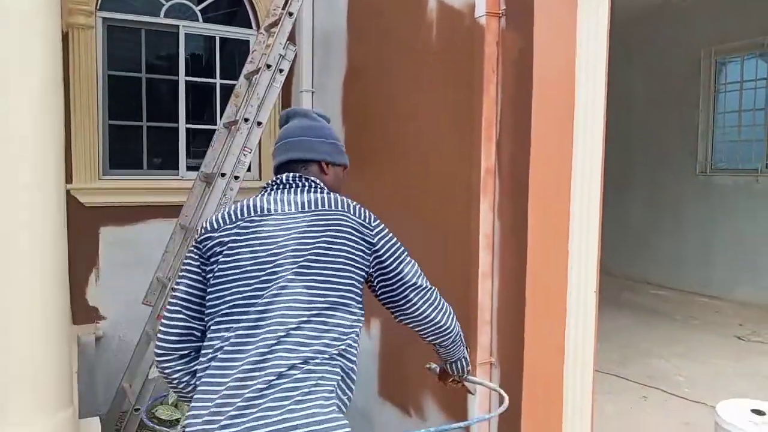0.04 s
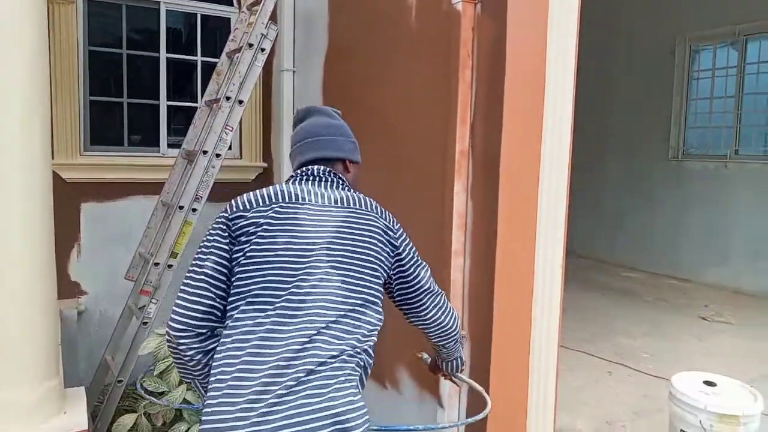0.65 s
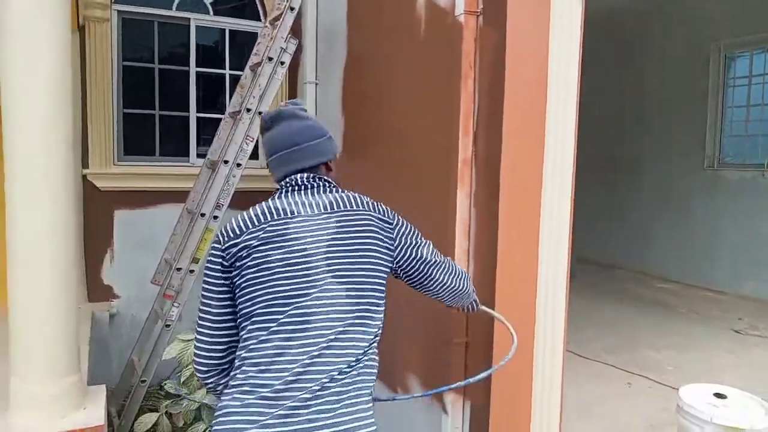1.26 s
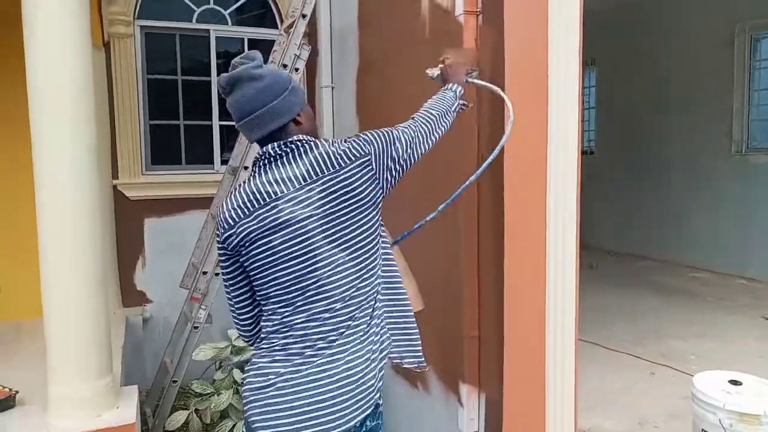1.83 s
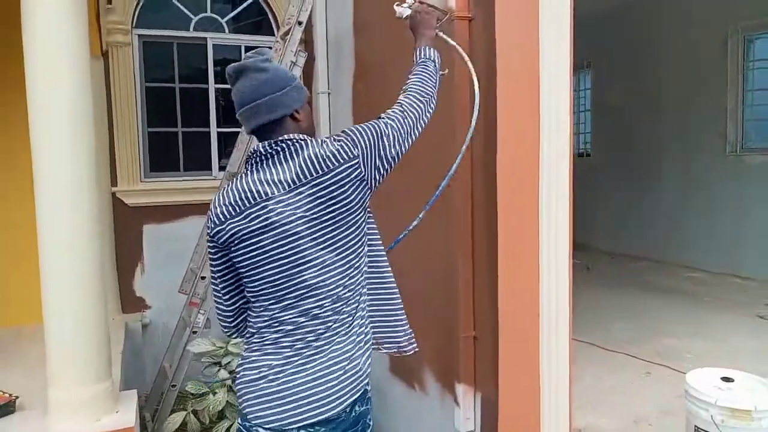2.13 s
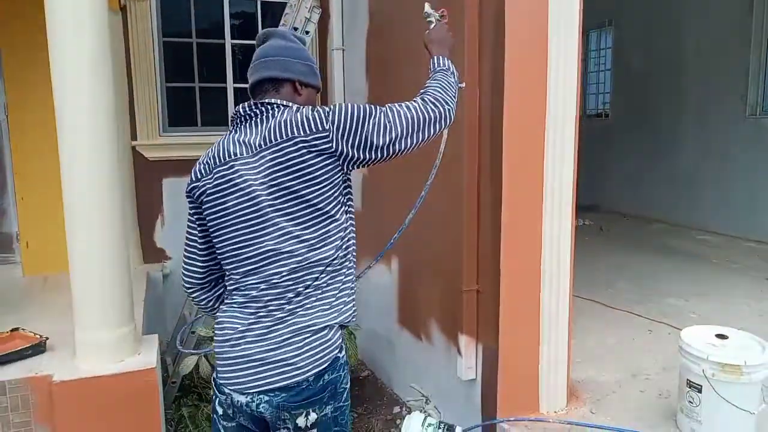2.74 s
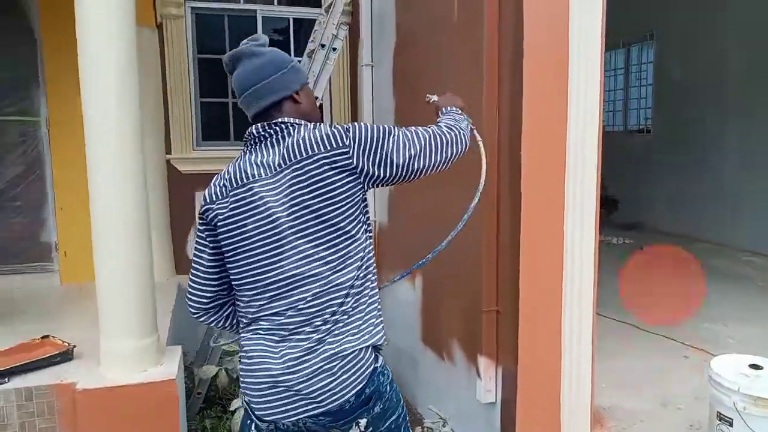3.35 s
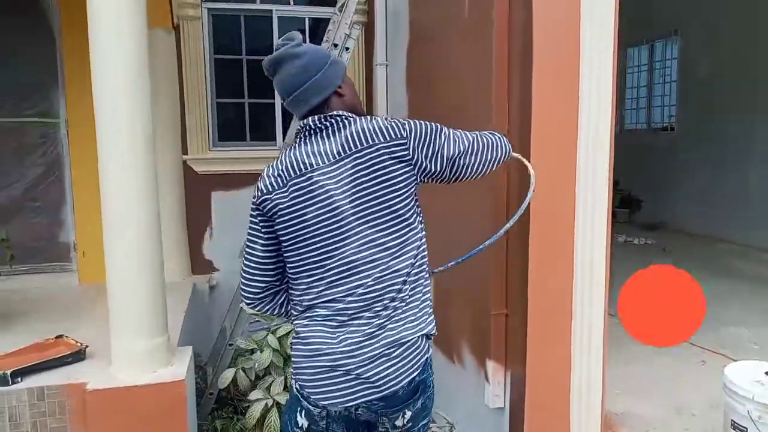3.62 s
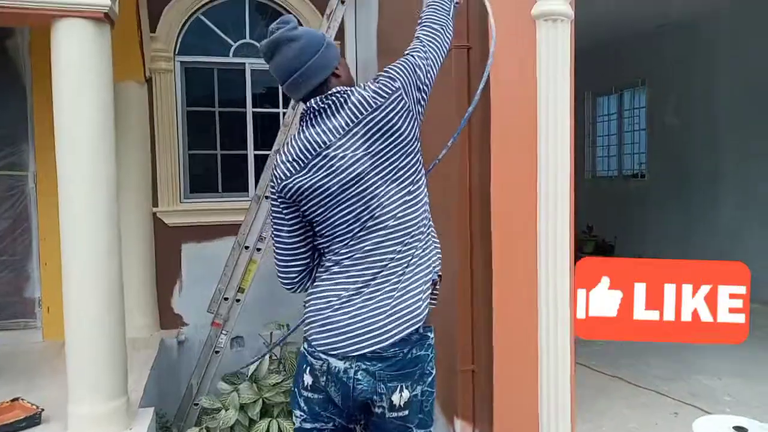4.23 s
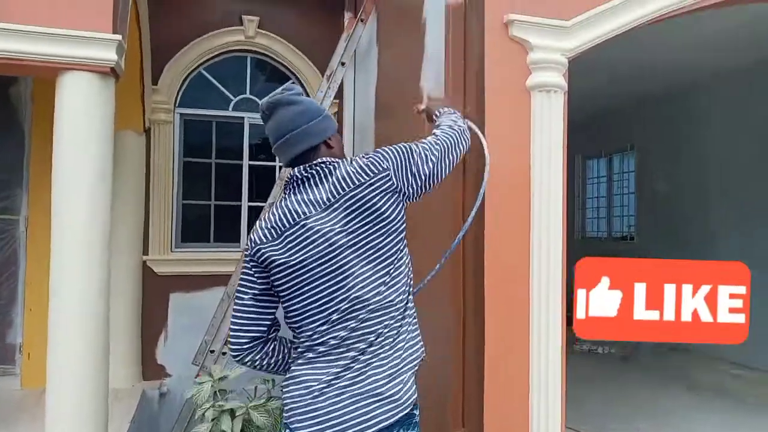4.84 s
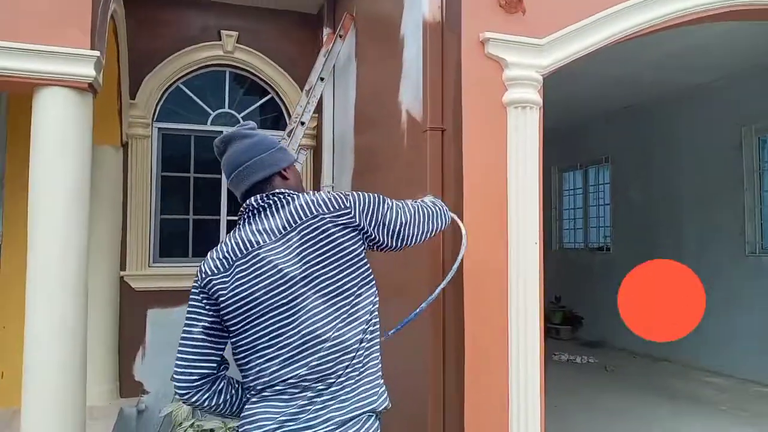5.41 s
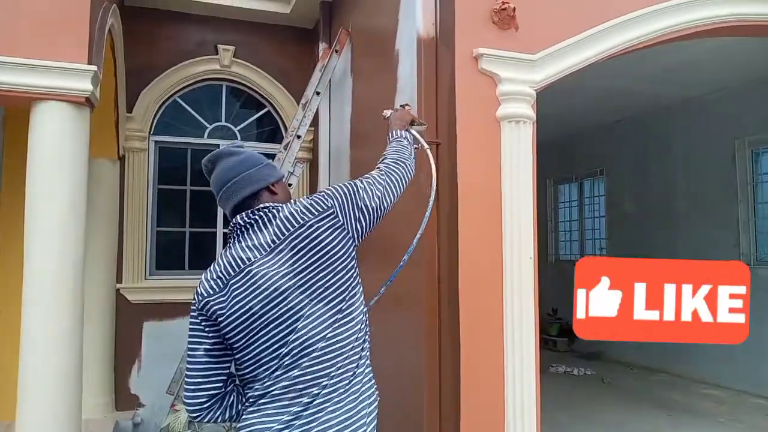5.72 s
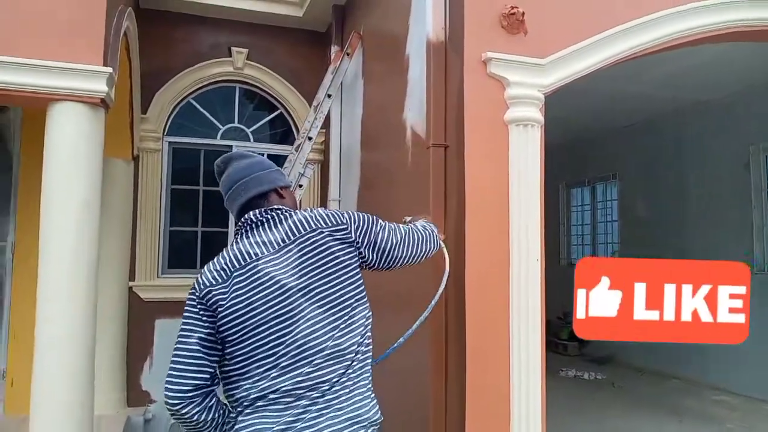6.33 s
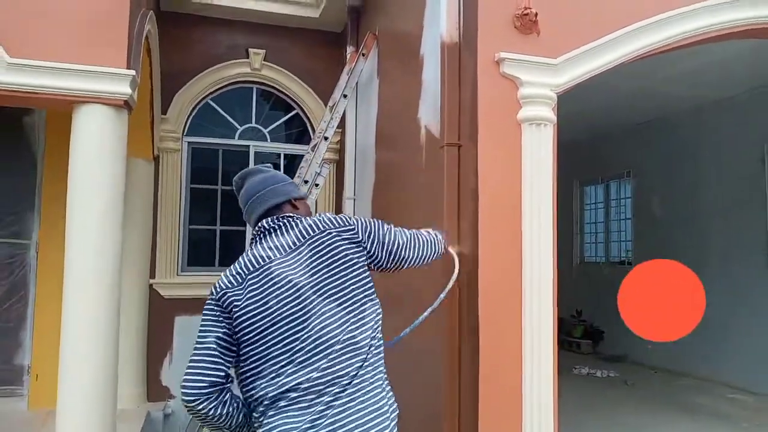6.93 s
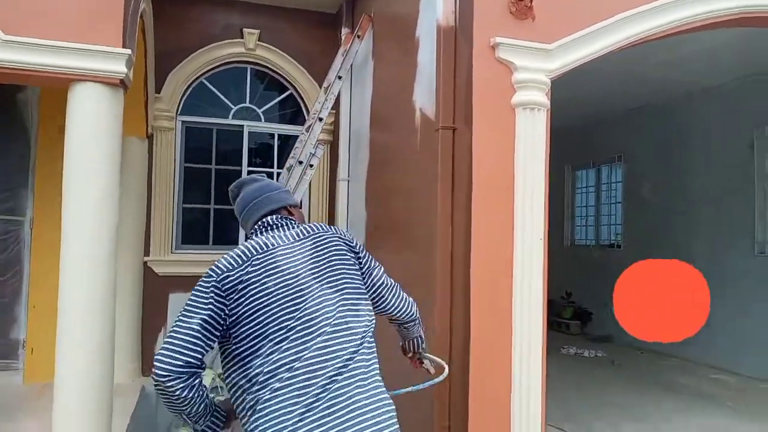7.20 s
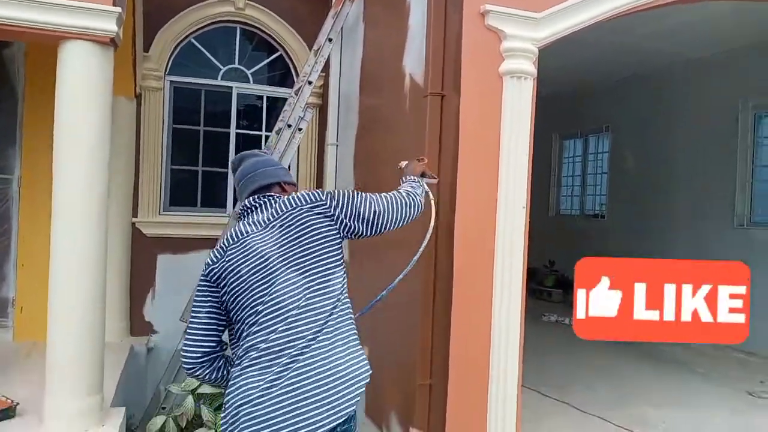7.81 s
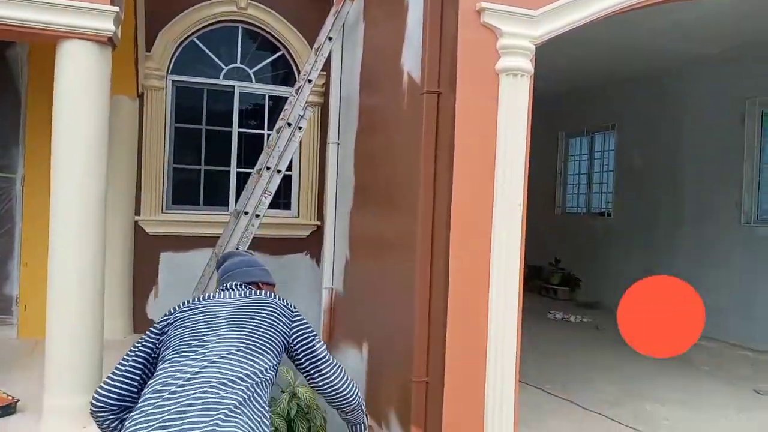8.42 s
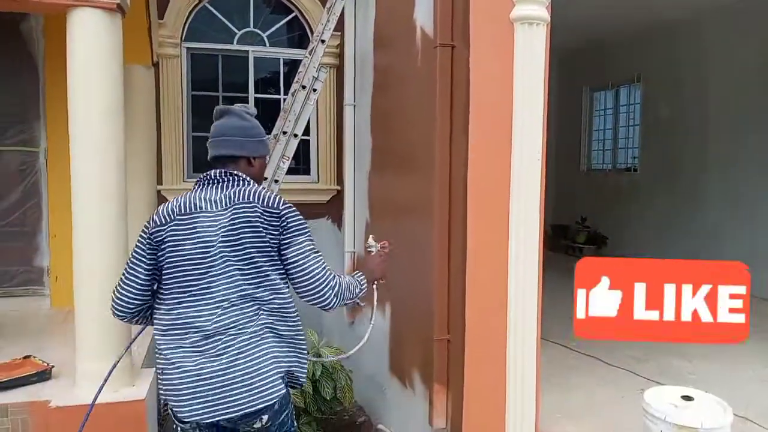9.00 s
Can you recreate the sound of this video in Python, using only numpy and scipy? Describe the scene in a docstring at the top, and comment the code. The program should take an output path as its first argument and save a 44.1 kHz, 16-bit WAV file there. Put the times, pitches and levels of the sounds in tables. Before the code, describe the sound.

A paint sprayer hisses in five short bursts outdoors, while its electric pump whirs up, clatters and knocks in between.

```python
"""Airless spraying beside an open garage

A painter sprays a house wall in five bursts: the jet atomises with a hiss and patters on the wall.
Spraying drops the pressure, so an electric piston pump runs up, then coasts: its gears clatter, its
piston knocks and its whine sags under each stroke. A distant engine hums, clothes rustle and wind
bumps the microphone. The phone's gain control turns everything down while the gun hisses."""
import sys
import numpy as np
from scipy import signal
from scipy.fft import rfft, irfft, next_fast_len
from scipy.io import wavfile
from scipy.ndimage import uniform_filter1d

SR = 44100
rng = np.random.default_rng(int(sys.argv[2]) if len(sys.argv) > 2 else 0)


def generate_wav(signal):
    """Clip the signal to [-1, 1] and save it as 16-bit WAV at the path in sys.argv[1]."""
    frames = np.transpose(np.atleast_2d(signal))
    scaled = np.clip(frames, -1, 1) * 32767
    pcm = np.round(scaled).astype(np.int16)
    wavfile.write(sys.argv[1], SR, pcm)


N = 399546
TIME = np.arange(N) / SR

# loudness of the distant engine: (time [s], level [dB])
ENGINE_LEVEL = [(0, -51), (.8, -66), (1.6, -60), (2.9, -56), (3.5, -48), (4.4, -44), (5.35, -41),
                (5.62, -48), (5.95, -42.5), (6.5, -46.5), (7.25, -44), (7.9, -61.5), (9.06, -63)]
# its pitch: (time [s], frequency [Hz])
ENGINE_PITCH = [(3.7, 127), (4.4, 128.5), (5.2, 130.3), (6.6, 128)]
# its partials: (multiple of the pitch [ratio], level [dB])
ENGINE_PARTIALS = [(.5, -17), (.66, -23.5), (1, -5.5)]
# loudness of the outdoor hiss: (time [s], level [dB])
AIR_ENVELOPE = [(0, -49), (.5, -52.5), (.9, -59.5), (2.75, -51), (3.05, -55.5), (3.27, -55.5), (3.55, -52),
                (4.4, -43), (5.5, -55.5), (6.0, -57), (6.6, -57), (9.06, -38.5)]
# its spectrum: (frequency [Hz], level [dB])
AIR_SPECTRUM = [(150, -1), (260, -5), (400, -11), (800, -8), (1150, -4), (1700, -7), (2700, -8), (3800, -3),
                (6500, 0), (8500, -11), (10500, -11.5), (13300, -28), (15000, -22)]
# faint far-off midrange sounds: (frequency [Hz], level [dB])
FAR_BANDS = [(510, -73), (900, -70), (1150, -69)]
# wind on the microphone: (time [s], duration [s], level [dB], centre [Hz], left minus right [dB])
WIND_BUMPS = [(0.061, 0.27, -50.5, 152, 2), (2.304, 0.044, -47, 93, 22), (2.752, 0.059, -49.5, 115.2, 28),
              (2.965, 0.038, -54, 80.5, -26), (3.007, 0.071, -45, 93, -21.5), (3.07, 0.05, -43, 125, -25),
              (6.997, 0.092, -34, 110.4, 25)]
# rustles and scuffs, faint far-off blips near 1 kHz (3.33 s, 6.11 s) and a bright burst from the
# pump's valve (4.41 s): (time [s], duration [s], level [dB], centre [Hz])
BRIEF_NOISES = [(.0, 0.34, -47, 2180), (.01, 0.55, -49, 10060), (.197, 0.014, -37.5, 1220),
                (.33, 0.045, -44.5, 5700), (.51, 0.16, -50.5, 6660), (.57, 0.057, -41.5, 1880),
                (.62, 0.33, -52.5, 10100), (.697, 0.0096, -37.5, 1710), (.71, 0.14, -43.5, 3560),
                (.822, 0.015, -40.5, 5970), (2.78, .24, -58, 9480), (3.33, 0.029, -65, 1150),
                (3.36, .07, -62, 8000), (3.52, 0.52, -56, 10000), (4.41, 0.07, -37, 5400),
                (5.805, 0.033, -39, 2540), (5.98, .06, -61, 3980), (6.11, .07, -61, 950)]
# runs of the motor: (start [s], run-up [s], time powered [s], full clatter [dB], clatter build-up [s])
MOTOR_RUNS = [(1.06, 0.7, 1.314, -24.5, 0.55), (3.98, 0.65, 1.083, -30, 0.59),
              (6.72, .72, .96, -23.5, 0.72), (8.32, 0.31, 0.65, -25.5, 0.14)]
# harmonics of the gear mesh, from the first upward: (level [dB])
MESH_HARMONICS = [-4, -8, -8.5, -8]
# gearbox resonances: (frequency [Hz], half width [Hz], lift [dB])
GEARBOX_RESONANCES = [(722, 106, 4.5), (1575, 53, 5)]
# cylinder modes: (frequency [Hz], level [dB], t60 [s], low clang share [ratio], high clang share [ratio])
CYLINDER_MODES = [(1296, 9, 0.0093, 0, 0.086), (1483, 2.5, 0.012, 0.31, 0), (1774, 7, 0.014, 0.93, 0.027),
                  (2854, 12.5, 0.012, 0.17, 0.62), (6610, 3, 0.037, 0.87, 0.44)]
# piston strokes: (time [s], level [dB], valve ping [dB], low clang [dB], high clang [dB],
# speed lost [fraction], gear groan [dB])
PISTON_STROKES = [(1.691, -10, -13, -1, -9, .31, -27), (1.8413, -10.5, -1, 7, 8, .19, -29),
                  (1.969, -13.5, -7, 8, 1, .26, -29), (2.098, -14.5, -6, 8, 0, .29, -31),
                  (2.2316, -6.5, 0, 2.5, 3, .31, -25.5), (2.369, -10, -7, 6, -7, .26, -30),
                  (4.5202, -19, -18, -3, -1, .2, -42), (4.622, -13.5, -7, 2.5, 0, .34, -27),
                  (4.767, -9.5, -5, 3.5, 13, .28, -23), (4.9035, -9, -4.5, -1, 2, .17, -27.5),
                  (5.337, -24, -45, -3, -7.5, .2, -46.5), (7.484, -12.5, -11, 0, 5, .28, -28),
                  (7.6205, -9, -4, -1.5, -3, .27, -33.5), (8.4915, -14, -16, -13, -10, .36, -31),
                  (8.673, -9, 1, 0, 8, .28, -28.5), (8.8083, -7, -1, 1, -2, .29, -26.5),
                  (8.9442, -11.5, -7, 4, -1, .26, -30.5)]
# valve knocks between strokes: (time [s], level [dB], low clang [dB], high clang [dB], tick [dB])
VALVE_KNOCKS = [(1.592, -14, -5, 2, -30), (1.781, -20, 3.5, 11, -30), (1.909, -21.5, 1, 10, -24),
                (2.04, -23.5, 4.5, 5, -20), (2.1699, -15, -1, -2, -14), (2.308, -16, -1, 0, -19),
                (4.5425, -14.5, -7, -4, -20), (4.5731, -17, -6, -11, -22), (4.7093, -14.5, -3, -2, -25),
                (4.843, -15.5, -1, 4, -25), (4.921, -18, -9, -7, -22), (5.0254, -22.5, 2, -5, -39),
                (7.411, -18.5, -8, 6, -6), (7.424, -20, -3, 0, -24), (7.553, -14.5, -1, 1, -6),
                (7.587, -22, -3, -7, -24), (7.736, -26, -4, -8, -28), (7.7856, -23.5, -12, -11, -36),
                (8.6, -15.5, -11, -7, -8.5), (8.619, -18.5, 2.5, -15, -24), (8.748, -13.5, -13, 6, -14),
                (8.8841, -20.5, -2, -2, -17)]
# response of the pump housing: (frequency [Hz], left [dB], right [dB])
HOUSING_SPECTRUM = [(116, -21, -36), (253, -11.5, -14.5), (358, -10, -16.5), (755, -4.5, -6.5),
                    (960, -10, -17), (1550, -6.5, -11), (2190, -13.5, -23.5), (4350, -17.5, -29),
                    (6900, -20.5, -27.5), (7280, -25.5, -41), (11100, -37.5, -31), (13800, -41, -51),
                    (14700, -33.5, -38)]
# trigger pulls: (open [s], shut [s], jet at start [dB], jet at end [dB],
# patter relative to the jet at start [dB], halfway [dB], at end [dB], opening snap [dB])
TRIGGER_PULLS = [(0.961, 1.854, -14, -8, -3, -1, -5, -40), (3.865, 4.144, -7, -12.5, -3, -1.5, -9.5, -32),
                 (4.643, 4.862, -12, -11.5, 8.5, -4, 4.5, -31),
                 (6.692, 7.034, -11, -7.5, -11.5, -1, 0.5, -33),
                 (7.838, 8.362, -11.5, -13, -8.5, -2, -28, -37)]
# spectrum of the spray: (frequency [Hz], left [dB], right [dB])
SPRAY_SPECTRUM = [(98, -26.5, -28.5), (252, -12.5, -17), (730, -16, -19), (1540, -19.5, -23),
                  (2380, -17, -24.5), (3800, -13.5, -21.5), (5820, -9.5, -16.5), (6450, -3.5, -10),
                  (8700, -5.5, -16), (10650, -12, -1.5), (11650, -4.5, -14), (12200, -26.5, -10),
                  (15570, 4, -6.5), (16150, -29, -18)]

TOP_HZ = 15900  # upper limit of the phone's passband


def undb(db):
    """Decibels express an amplitude ratio logarithmically; return that ratio."""
    return np.exp(np.asarray(db) * (np.log(10) / 20))


def unit(x):
    """Normalisation to an rms of 1."""
    return x / np.sqrt(np.mean(x ** 2) + 1e-20)


def curve(rows):
    """Linear interpolation between (time, value) rows."""
    return np.interp(TIME, *np.transpose(rows))


def walk(rate_hz):
    """Low-pass noise: a smooth random wander with an rms of 1."""
    steps = rng.standard_normal(2 ** 12)
    wander = np.interp(TIME * rate_hz, np.arange(len(steps)), steps)
    return unit(uniform_filter1d(wander, int(SR / rate_hz)))


def add(track, start_s, sound):
    """Superposition of a sound on a track."""
    i = max(int(start_s * SR), 0)
    track[i:i + len(sound)] += sound[:max(N - i, 0)]


def band(x, lo_hz, hi_hz, order=2):
    """Butterworth band-pass filtering."""
    edges = [lo_hz, min(hi_hz, SR / 2 - 1000)]
    return signal.sosfilt(signal.butter(order, edges, "band", fs=SR, output="sos"), x)


def cutoff(x, hz, kind, order):
    """Butterworth low-pass or high-pass filtering."""
    return signal.sosfilt(signal.butter(order, hz, kind, fs=SR, output="sos"), x)


def smooth(x, keep):
    """Leaky integration: each sample retains the fraction keep of the last."""
    return signal.lfilter([1 - keep], [1, -keep], x)


def colour(x, spectrum):
    """Minimum-phase filtering, with one output for each level column of the spectrum."""
    hz, *columns = np.transpose(spectrum)
    size = next_fast_len(N + SR // 4)
    size += size % 2
    log_f = np.log(np.maximum(np.fft.rfftfreq(size, 1 / SR), 1))
    roll_off = np.clip(2 * (log_f - np.log(hz[0])), -10, 0)  # below the first point
    cepstrum = irfft([np.log(undb(np.interp(log_f, np.log(hz), db))) + roll_off for db in columns])
    cepstrum[:, 1:size // 2] *= 2  # folding makes the filter causal
    cepstrum[:, size // 2 + 1:] = 0
    return irfft(rfft(x, size) * np.exp(rfft(cepstrum)))[:, :N]


def tinted(x, spectrum):
    """Spectral shaping that conserves the power of white noise."""
    hz, *columns = np.transpose(spectrum)
    log_f = np.log(np.linspace(hz[0], TOP_HZ, 2 ** 10))
    power = np.mean([undb(np.interp(log_f, np.log(hz), db)) ** 2 for db in columns])
    return colour(x, spectrum) / np.sqrt(power * TOP_HZ / (SR / 2))


def puffs(rows, spread, rise):
    """Amplitude modulation: short arches of band-limited noise."""
    out = np.zeros(N)
    for start, length, db, hz in rows:
        progress = np.linspace(0, 1, int(max(length, .01) * SR))
        noise = unit(band(rng.standard_normal(SR), hz / spread, hz * spread, order=3)[-len(progress):])
        add(out, start, undb(db) * noise * np.sin(np.pi * progress ** rise))
    return out


def swell(times, sizes, delay_s, width_s):
    """A Gaussian pulse offset from each event."""
    out, t = np.zeros(N), np.arange(-SR // 8, SR // 4) / SR
    for start, size in zip(times, sizes):
        add(out, start + t[0], size * np.exp(-((t - delay_s) / width_s) ** 2))
    return out


def response(lag_samples, early_db, early_s, tail_db, tail_t60, shared_hz):
    """Impulse response: direct sound, reflections from near walls, then the garage's reverberation."""
    t = np.arange(SR // 2) / SR
    white = rng.standard_normal((3, len(t)))
    low = smooth(white, np.exp(-2 * np.pi * shared_hz / SR))
    noise = low[2] + white[:2] - low[:2]  # long waves reach both channels alike
    early = unit(noise * np.exp(-t / early_s) * (t > .002))
    tail = unit(noise * np.exp(-np.log(1000) * t / tail_t60) * np.minimum(t / .03, 1))
    echoes = (undb(early_db) * early + undb(tail_db) * tail) / np.sqrt(len(t))
    echoes[:, 0] += 1
    echoes[0] = np.roll(echoes[0], int(lag_samples))  # later on the left
    return echoes / np.sqrt(np.sum(echoes ** 2) / 2)


def space(x, **walls):
    """Time-varying convolution: the phone is carried about, so the echoes change every half second."""
    out = np.zeros((2, N))
    hop = SR // 2
    padded = np.pad(x, (hop, 2 * hop))
    for i in range(0, N + hop, hop):
        piece = padded[i:i + 2 * hop] * np.hanning(2 * hop)
        for ear, sound in zip(out, signal.fftconvolve(piece[None], response(**walls), axes=1)):
            add(ear, (i - hop) / SR, sound[max(hop - i, 0):])
    return out


def linger(level, tail_db, t60):
    """Incoherent addition: the envelope of a hiss and its reverberation sum in power."""
    tail_power = smooth(level ** 2, undb(-120 / (t60 * SR)))
    return np.sqrt(level ** 2 + undb(tail_db) ** 2 * tail_power)


def gain_control(x, threshold_db=-35, ratio=2.047, attack_s=0.0012, release_db_per_s=275):
    """Compression: loud treble lowers the gain quickly, and it recovers at an even rate."""
    treble = cutoff(x, 8900, "high", order=2)
    power = smooth(np.mean(treble ** 2, axis=0), np.exp(-1 / (attack_s * SR)))
    release_db = release_db_per_s * TIME
    held_db = np.maximum.accumulate(10 * np.log10(power + 1e-20) + release_db) - release_db
    return x * undb(-np.maximum(held_db - threshold_db, 0) * (1 - 1 / ratio))


def outdoor_air():
    """Ambient noise: a low breeze, a faint hiss and far-off sounds that flicker in the midrange."""
    breeze = undb(-58 + 2.3 * walk(6.1)) * unit(band(rng.standard_normal((2, N)), 58, 164))
    air = unit(colour(rng.standard_normal((2, N)), AIR_SPECTRUM))
    air *= undb(curve(AIR_ENVELOPE) + 1.3 * walk(14))
    for hz, db in FAR_BANDS:
        noise = band(rng.standard_normal((2, N)), hz / 1.2, hz * 1.144)
        air += undb(db) * unit(noise * undb(11 * np.tanh(walk(21))))
    return (breeze + air) * np.array([[1.2], [.75]])


def distant_engine():
    """Periodic vibration gives a hum of partials, swelling and fading with a random rumble."""
    phase = 2 * np.pi * np.cumsum(curve(ENGINE_PITCH) * (1 + 0.00433 * walk(3.065))) / SR
    hum = np.sqrt(2) * sum(np.sin(k * phase) * undb(db + 0.62 * walk(18)) for k, db in ENGINE_PARTIALS)
    noise = unit(band(rng.standard_normal((3, N)), 69, 154)) * undb(1.6 * walk(15))
    rumble = undb(-16) * (noise[0] + 1.7 * noise[1:])
    return undb(curve(ENGINE_LEVEL)) * (hum * np.array([[1.15], [.85]]) + rumble)


def wind():
    """Turbulent pressure: eddies strike one microphone port harder than the other."""
    ports = [[(start, length, db + side * pan_db, hz) for start, length, db, hz, pan_db in WIND_BUMPS]
             for side in (.5, -.5)]
    return np.array([puffs(bumps, spread=1.346, rise=0.87) for bumps in ports])


def brief_noises():
    """Reflection: rustles, far-off blips and one bright burst from the pump's valve echo off the walls."""
    noises = space(puffs(BRIEF_NOISES, spread=1.93, rise=0.56), lag_samples=42,
                   early_db=5, early_s=0.0048, tail_db=0.5, tail_t60=0.52, shared_hz=800)
    return noises * np.array([[1.2], [.85]])


def motor(coast_s=.42, unpowered_db=-11.5):
    """Inertia: speed ramps up, then decays. Returns relative speed and the clatter and whine envelopes."""
    speed, clatter, whine = np.zeros((3, N))
    for start, run_up_s, powered_s, db, build_s in MOTOR_RUNS:
        coasting = np.maximum(TIME - start - powered_s, 0)
        slowing = np.exp(-coasting / coast_s)
        turning = np.clip((TIME - start) / run_up_s, 0, 1) * slowing
        shaking = np.clip((TIME - start) / build_s, 0, 1) * slowing
        speed = np.maximum(speed, turning)
        # amplitudes follow steep power laws and drop once the power is off
        clatter += shaking ** 5.45 * undb(db + unpowered_db * np.minimum(coasting / 0.1, 1))
        whine += turning ** 6.5 * undb(db - 13 + unpowered_db / 2 * np.minimum(coasting / 0.036, 1))
    return speed, clatter, whine


def gear_whine(mesh_hz, phase):
    """Resonance: each harmonic of the gear mesh flares as it sweeps through a gearbox mode."""
    out = 0
    for k, db in enumerate(MESH_HARMONICS, 1):
        flare_db = sum(lift_db / (1 + ((k * mesh_hz - hz) / width) ** 2)
                       for hz, width, lift_db in GEARBOX_RESONANCES)
        out = out + undb(db + flare_db + 2 * walk(130)) * np.sin(k * phase)
    return out


def gear_clatter(phase, clacks_per_s=70, decay_s=.0016):
    """Backlash: teeth rattle in their play, loudest at each mesh, and clack at random moments."""
    impulses = (rng.random(N) < clacks_per_s / SR) * rng.uniform(.3, 1.3, N)
    clacks = undb(4) * signal.lfilter([1], [1, -np.exp(-1 / (decay_s * SR))], impulses)
    rattle = rng.standard_normal(N) * (1 + clacks) * undb(1.5 * walk(300))
    return band(unit(rattle * (1 + .5 * np.cos(phase))), 314, 22000, order=1)


def valve_tick(decay_s=0.0063):
    """A closing valve makes a short transient, rich in treble."""
    t = np.arange(SR // 16) / SR
    return band(rng.standard_normal(len(t)), 8500, 19000) * np.exp(-t / decay_s)


def valve_ping(hz=4690, decay_s=0.002):
    """Damped vibration: the valve ball hits its seat with a tick and rings briefly."""
    t = np.arange(SR // 16) / SR
    ring = np.sin(2 * np.pi * hz * (1 + 0.025 * rng.standard_normal()) * t) * np.exp(-t / decay_s)
    return (ring + undb(-8) * valve_tick()) * np.minimum(t / 0.00038, 1)


def knock(low_db, high_db, crack_s, rise_s, ring_db):
    """Modal excitation: steel hits steel with a crack, and each blow rings the cylinder differently."""
    t = np.arange(SR // 8) / SR
    crack = rng.standard_normal(len(t)) * np.exp(-t / crack_s)
    ring = 0
    for hz, db, t60, low_share, high_share in CYLINDER_MODES:
        swing = np.sin(2 * np.pi * hz * (1 + 0.01 * rng.standard_normal()) * t)
        mode_db = db + low_share * low_db + high_share * high_db + 1.5 * rng.standard_normal()
        ring = ring + undb(mode_db) * swing * np.exp(-np.log(1000) * t / t60)
    crack = unit(band(crack, 720, 13400, order=1)) * np.sqrt(np.mean(crack ** 2))
    return (crack + undb(ring_db) * ring) * np.minimum(t / rise_s, 1)


def piston(frame_hz=273):
    """Impact: each stroke pings, knocks and thumps the frame; the valve knocks more softly in between."""
    knocks, thumps = np.zeros((2, N))
    t = np.arange(SR // 4) / SR
    thump = np.sin(2 * np.pi * frame_hz * t) * np.minimum(t / 0.0049, 1) * np.exp(-t / 0.013)
    for start, db, ping_db, low_db, high_db, *_ in PISTON_STROKES:
        add(knocks, start - .002, undb(ping_db) * valve_ping())  # the ball seats before the blow
        blow = knock(low_db, high_db, crack_s=0.0064, rise_s=0.00092, ring_db=-7.5)
        bright_hz = 20000 * undb(min(db + 12.5, 0))  # a softer blow is duller
        add(knocks, start, undb(db) * band(blow, 104, bright_hz, order=1))
        add(thumps, start + 0.0016, undb(db - 16) * thump)
    for start, db, low_db, high_db, tick_db in VALVE_KNOCKS:
        add(knocks, start, undb(tick_db) * valve_tick())
        blow = knock(low_db, high_db, crack_s=0.011, rise_s=0.0014, ring_db=-1.5)
        add(knocks, start, undb(db) * band(blow, 300, 5600, order=1))
    return knocks, thumps


def pump(full_mesh_hz=852.8):
    """Load modulation: each stroke slows the motor, so the whine sags and the gears labour."""
    speed, clatter_level, whine_level = motor()
    knocks, thumps = piston()
    times, stroke_db, *_, speed_lost, groan_db = np.transpose(PISTON_STROKES)
    sag = swell(times, speed_lost, delay_s=.065, width_s=.039)
    groan = swell(times, undb(groan_db), delay_s=0.032, width_s=0.029)
    # gears run light just before a stroke and grind just after it
    slack = undb(-9.5 * swell(times, np.ones(len(times)), delay_s=-0.0056, width_s=0.015))
    grind = swell(times, undb(stroke_db - 13), delay_s=0.0061, width_s=0.024)
    mesh_hz = full_mesh_hz * speed * (1 - sag) * (1 + 0.01034 * walk(200))
    phase = 2 * np.pi * np.cumsum(mesh_hz) / SR
    whine = gear_whine(mesh_hz, phase) * (whine_level * slack + groan)
    clatter = gear_clatter(phase) * (clatter_level + grind) * slack
    blows = space(clatter + knocks, lag_samples=22,
                  early_db=-2, early_s=0.007, tail_db=-4, tail_t60=0.63, shared_hz=930)
    # low tones diffract round the painter and arrive mostly direct
    tones = space(whine + thumps, lag_samples=25,
                  early_db=-6, early_s=0.0047, tail_db=-5.5, tail_t60=0.75, shared_hz=900)
    return tinted(blows + tones, HOUSING_SPECTRUM)


def spits():
    """Onset transient: as the needle lifts, the first slug of paint leaves the tip with a snap."""
    snaps = [(start, .012, snap_db, 3200) for start, *_, snap_db in TRIGGER_PULLS]
    return puffs(snaps, spread=1.3, rise=.5) * np.array([[1.3], [.6]])


def droplets(grain_db, direct, lag_samples=39):
    """Partial coherence: a wide fan gives each channel its own noise, plus a direct part, later at left."""
    noise = unit(rng.standard_normal((3, N)) * undb(grain_db * rng.exponential(size=(3, N))))
    return unit(noise[:2] + direct * np.array([np.roll(noise[2], lag_samples), noise[2]]))


def spray(crossover_hz=2600, surge_db=4, beam_db=2.4):
    """Atomisation: the paint sheet tears into droplets with a hiss, and they patter on the wall."""
    flow, impacts = np.zeros((2, N))
    for start, stop, first_db, last_db, *patter_db, _ in TRIGGER_PULLS:
        needle = np.clip((TIME - start) / 0.0051, 0, 1) * np.exp(-np.maximum(TIME - stop, 0) / 0.024)
        surge = np.exp(-np.maximum(TIME - start, 0) / .012)  # pressure stored in the hose
        jet = needle * undb(np.interp(TIME, [start, stop], [first_db, last_db]) + surge_db * surge)
        flow += jet
        impacts += jet * undb(np.interp(TIME, np.linspace(start, stop, len(patter_db)), patter_db))
    hiss = droplets(grain_db=0.1, direct=0.4) * linger(flow, tail_db=-6.5, t60=0.31)
    hiss = cutoff(hiss * undb(1.9 * walk(23) + 0.33 * walk(430)), crossover_hz, "high", order=3)
    patter = droplets(grain_db=3, direct=1) * linger(impacts, tail_db=-16, t60=0.55)
    patter = cutoff(patter, crossover_hz, "low", order=3) * undb(1.5 * walk(12))
    # comb filtering: the delay of the wall reflection shifts as the arm sweeps
    delayed_time = TIME - .0011 - .00015 * walk(2)
    patter += .45 * np.array([np.interp(delayed_time, TIME, ear) for ear in patter])
    # directivity: the sweeping fan beams each bright band towards the phone and away again
    beam = sum(band(hiss, lo_hz, hi_hz, order=1) * (undb(beam_db * np.tanh(walk(7))) - 1)
               for lo_hz, hi_hz in [(3000, 5000), (5800, 8500), (10000, 15000)])
    return tinted(hiss + beam + patter, SPRAY_SPECTRUM)


def scene():
    """Superposition of painter, gun, pump and surroundings in front of the house."""
    return brief_noises() + spray() + spits() + pump() + wind() + distant_engine() + outdoor_air()


def record(dry):
    """Compression, soft saturation and band limiting in the phone."""
    ceiling = .8
    rounded = ceiling * np.tanh(gain_control(dry) / ceiling)
    return signal.sosfilt(signal.ellip(10, .2, 70, TOP_HZ, fs=SR, output="sos"), rounded)


dry = scene()
out = record(dry)
generate_wav(out)
```